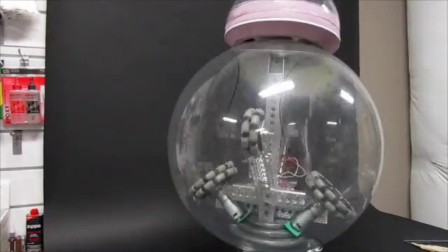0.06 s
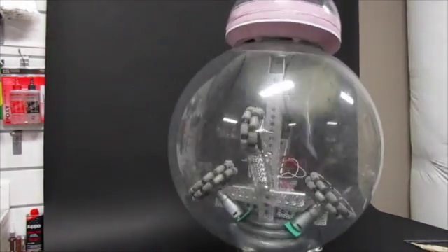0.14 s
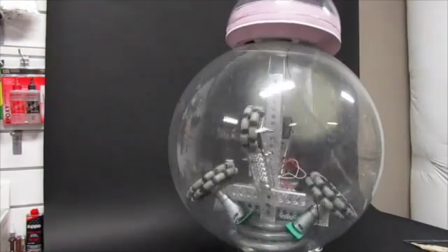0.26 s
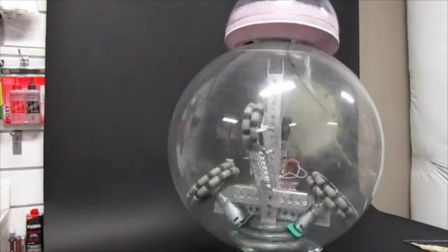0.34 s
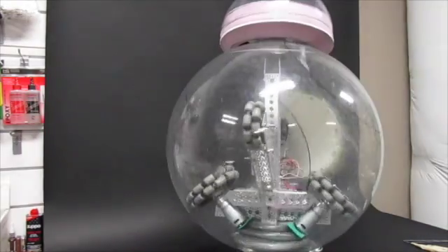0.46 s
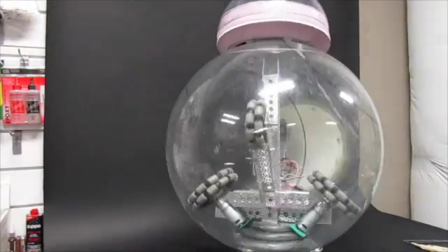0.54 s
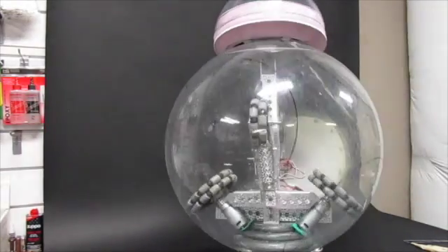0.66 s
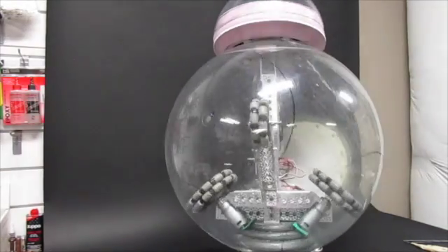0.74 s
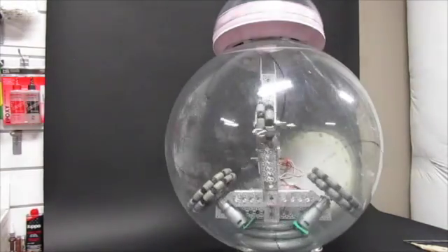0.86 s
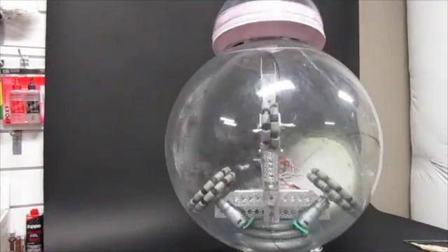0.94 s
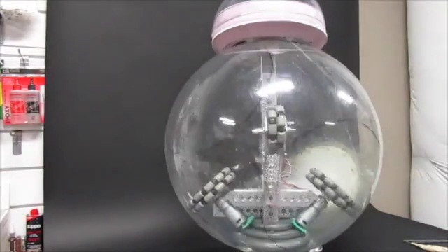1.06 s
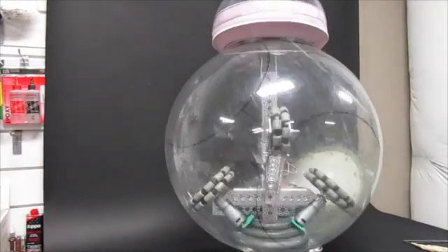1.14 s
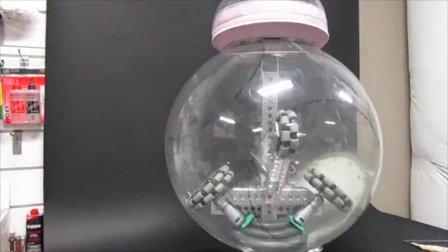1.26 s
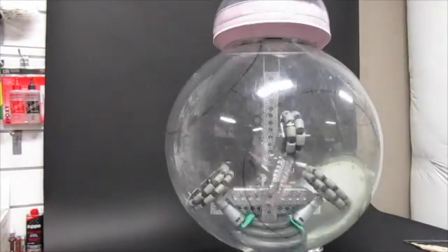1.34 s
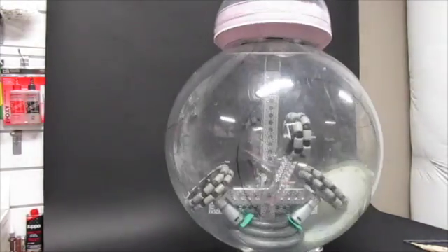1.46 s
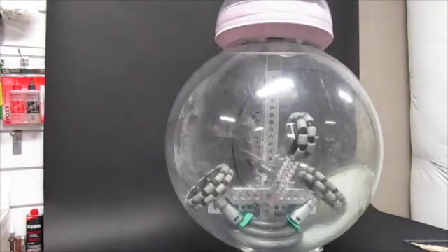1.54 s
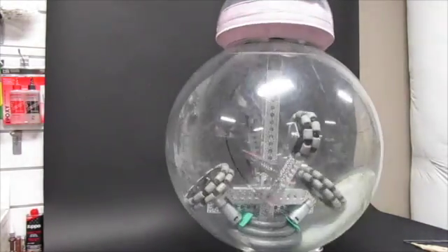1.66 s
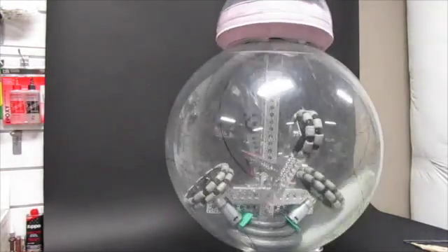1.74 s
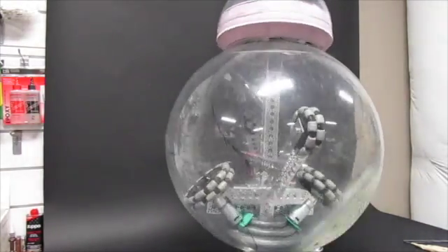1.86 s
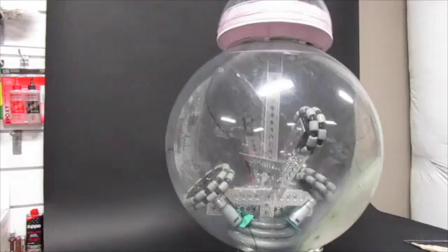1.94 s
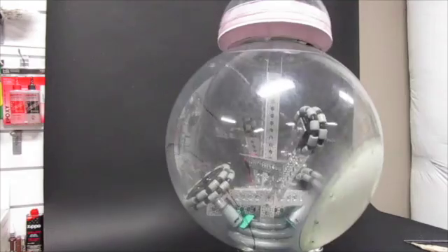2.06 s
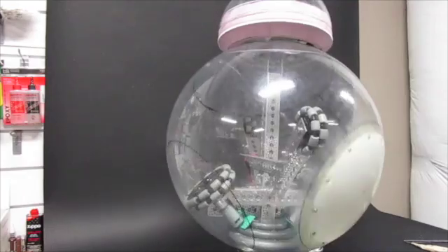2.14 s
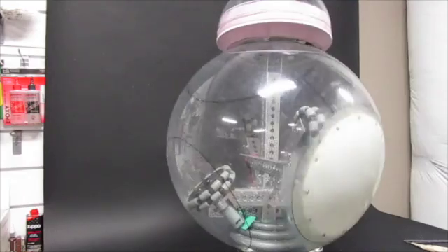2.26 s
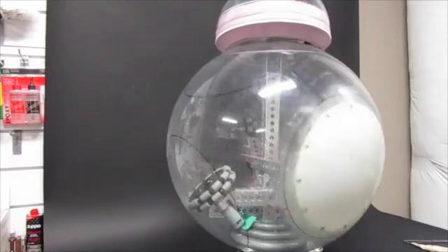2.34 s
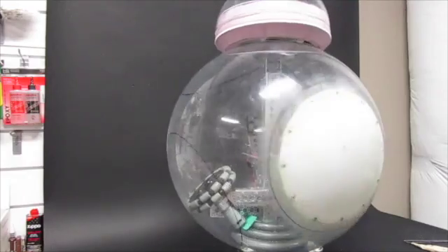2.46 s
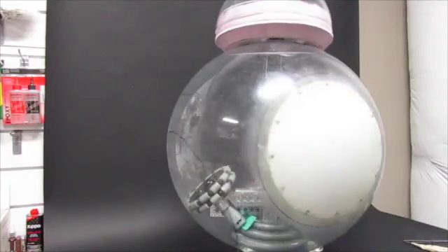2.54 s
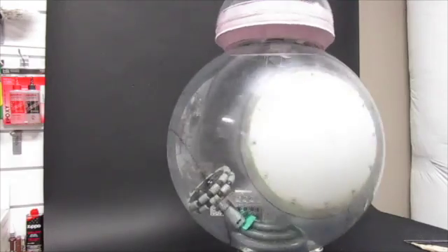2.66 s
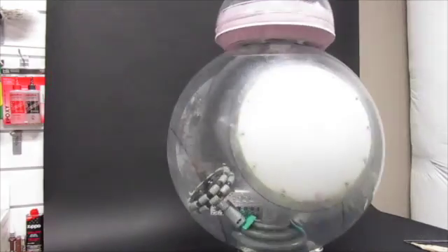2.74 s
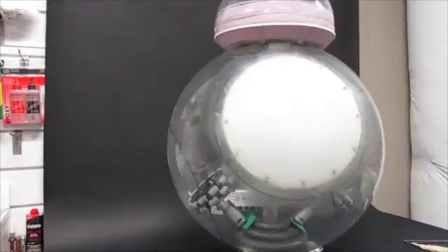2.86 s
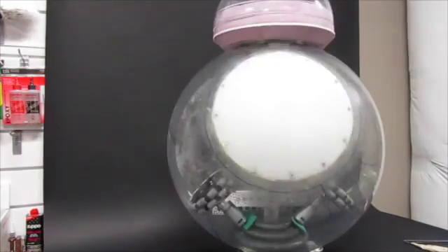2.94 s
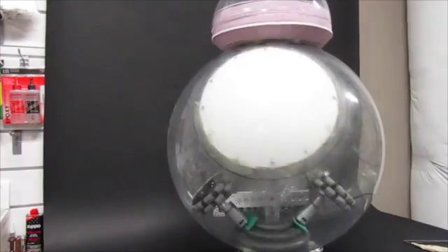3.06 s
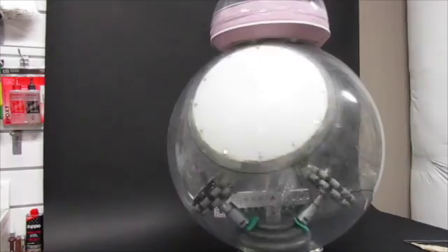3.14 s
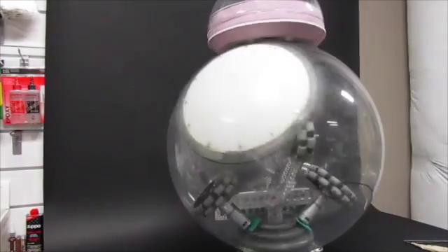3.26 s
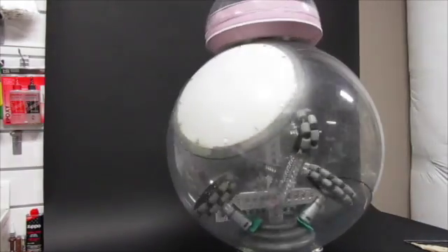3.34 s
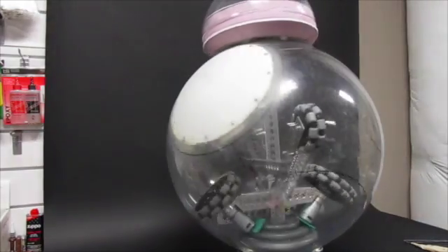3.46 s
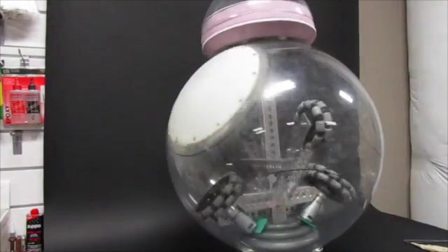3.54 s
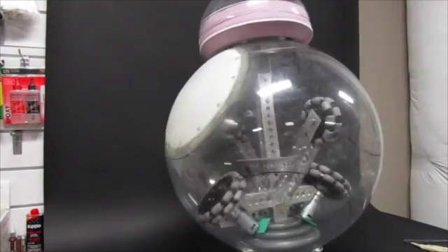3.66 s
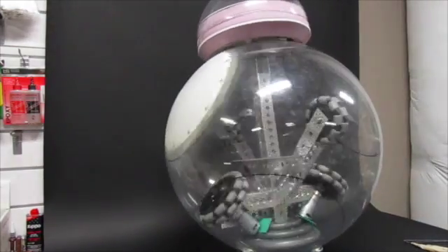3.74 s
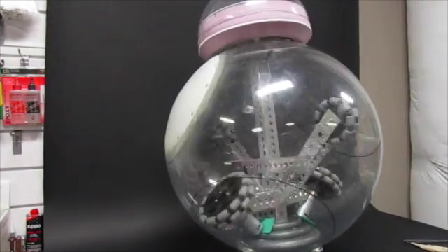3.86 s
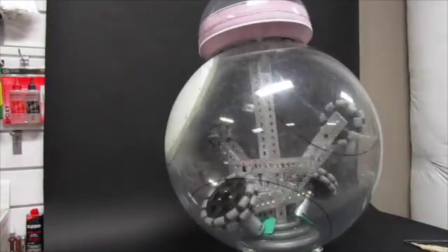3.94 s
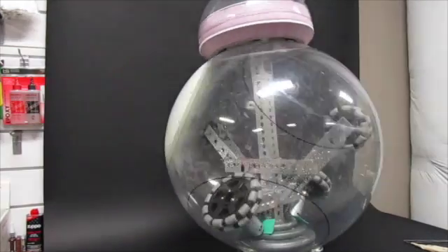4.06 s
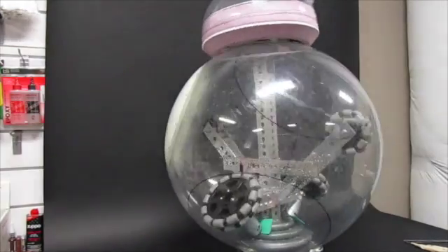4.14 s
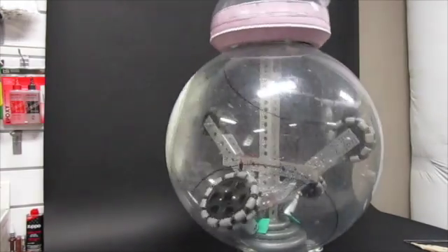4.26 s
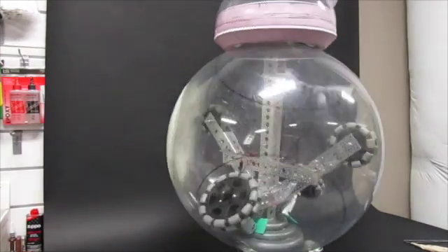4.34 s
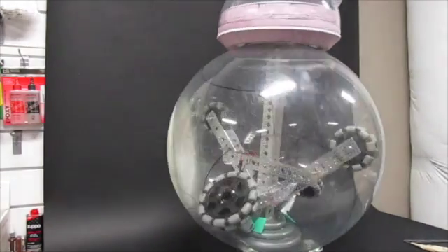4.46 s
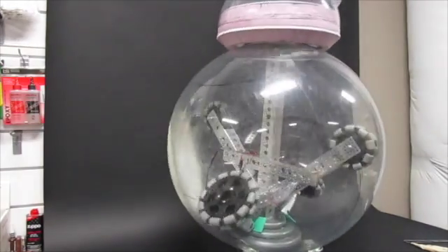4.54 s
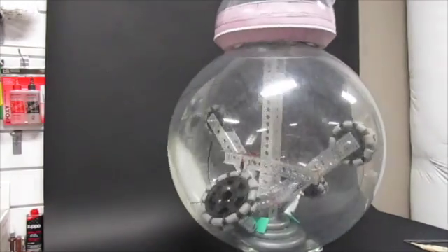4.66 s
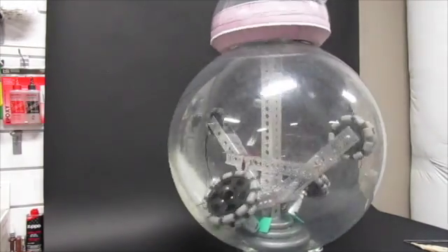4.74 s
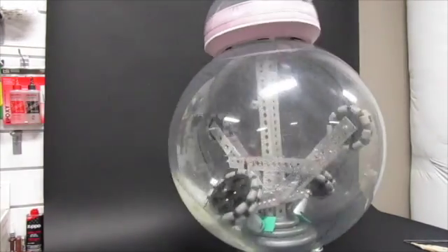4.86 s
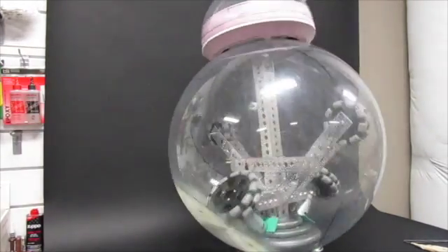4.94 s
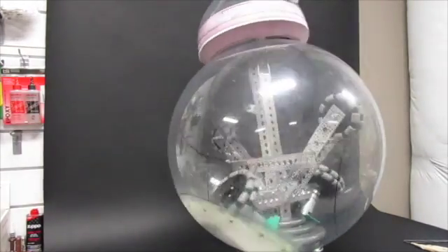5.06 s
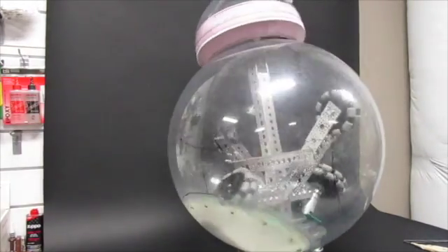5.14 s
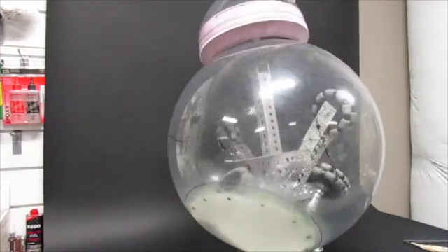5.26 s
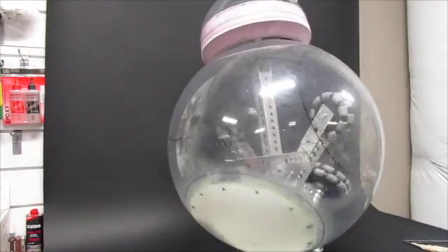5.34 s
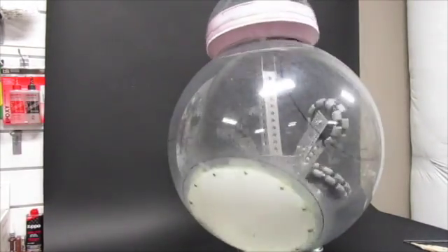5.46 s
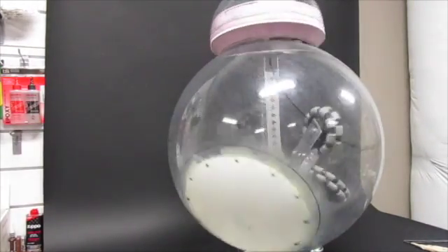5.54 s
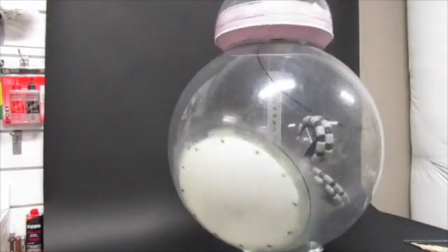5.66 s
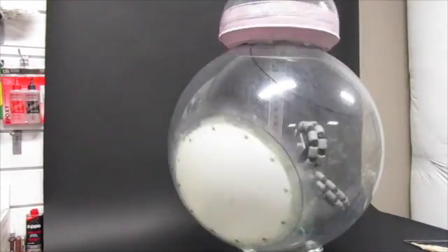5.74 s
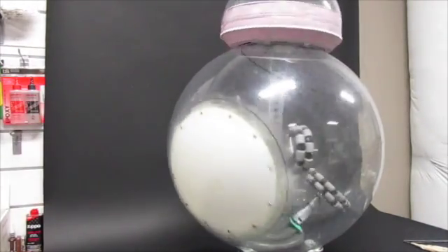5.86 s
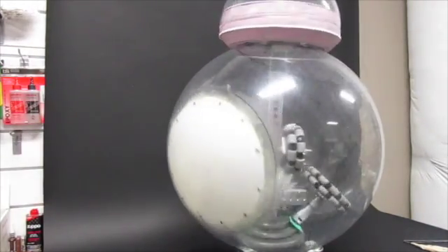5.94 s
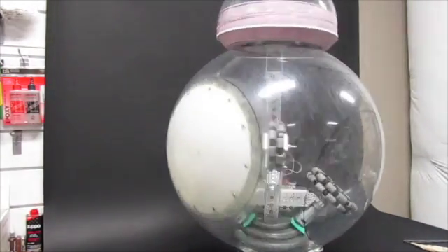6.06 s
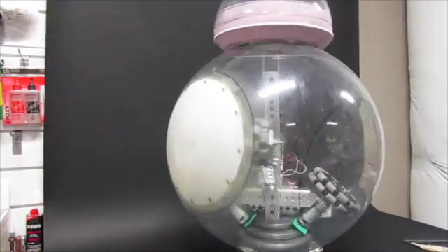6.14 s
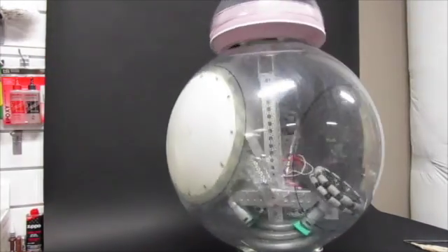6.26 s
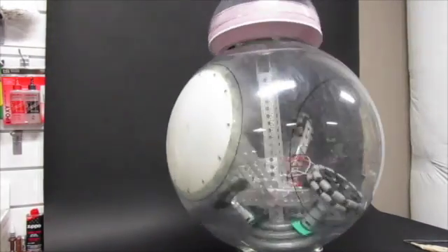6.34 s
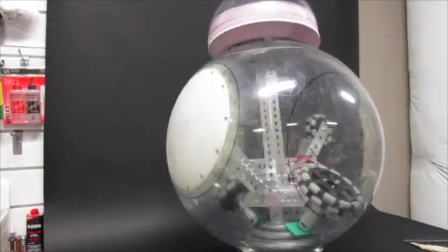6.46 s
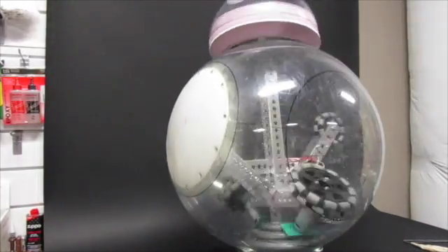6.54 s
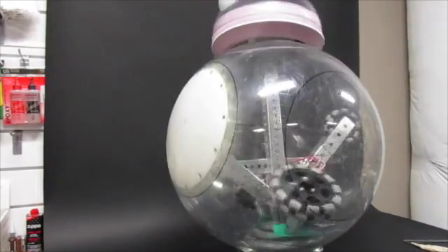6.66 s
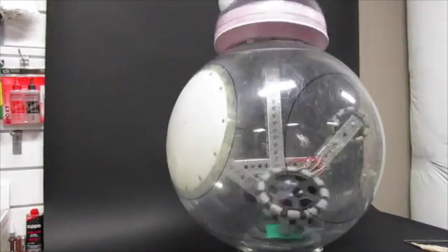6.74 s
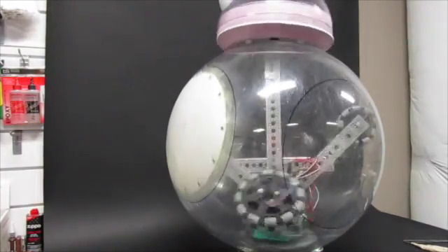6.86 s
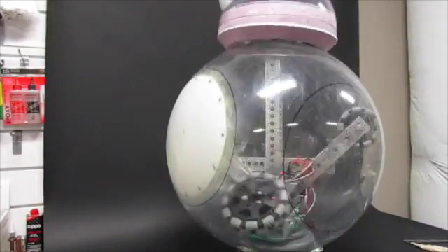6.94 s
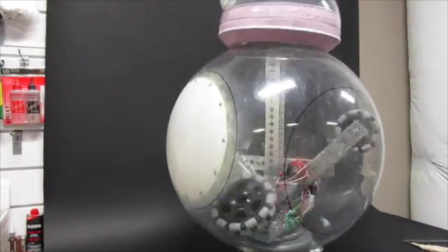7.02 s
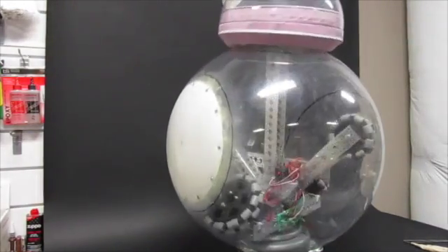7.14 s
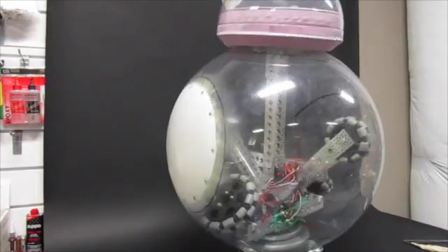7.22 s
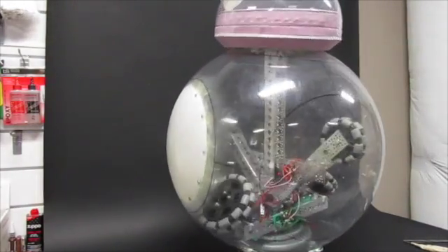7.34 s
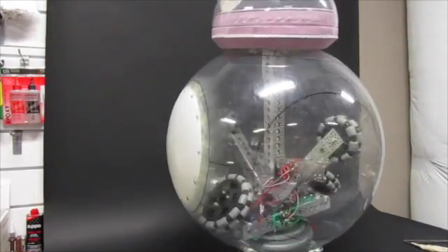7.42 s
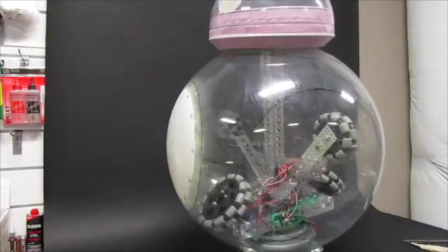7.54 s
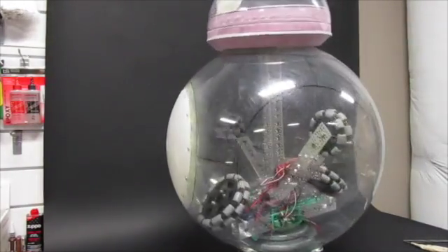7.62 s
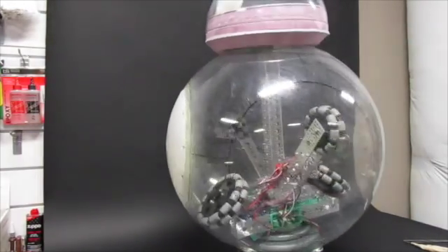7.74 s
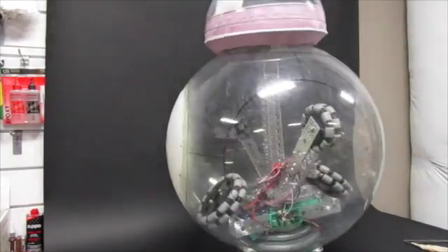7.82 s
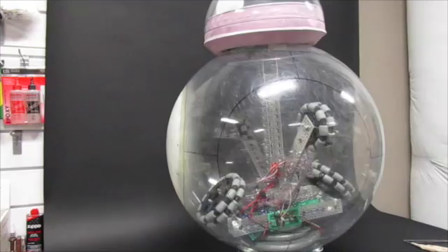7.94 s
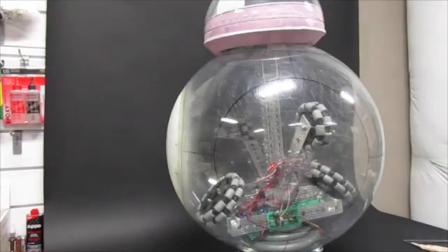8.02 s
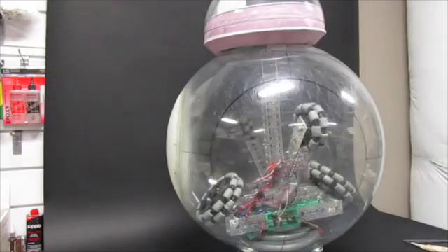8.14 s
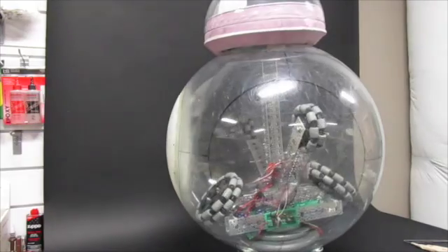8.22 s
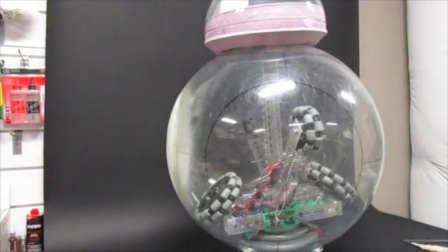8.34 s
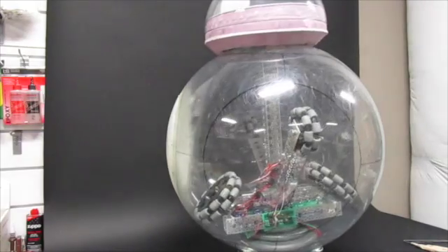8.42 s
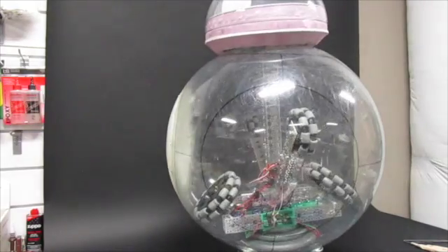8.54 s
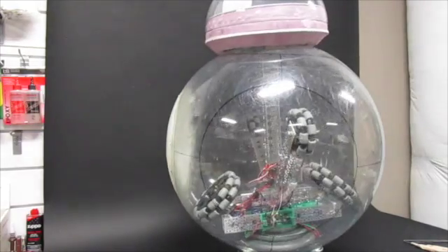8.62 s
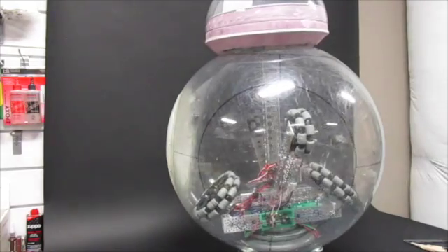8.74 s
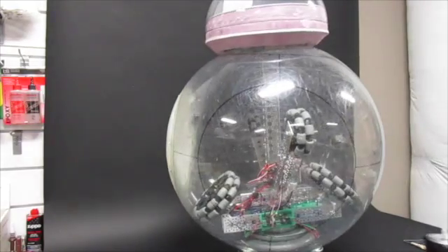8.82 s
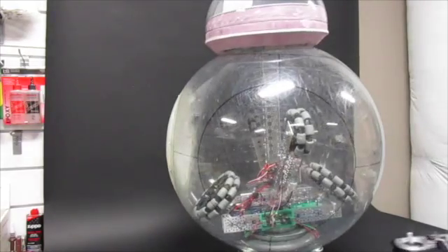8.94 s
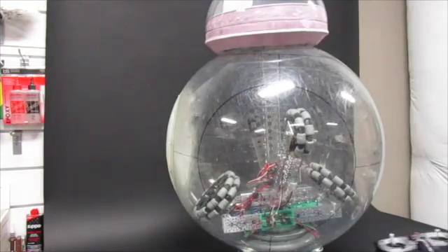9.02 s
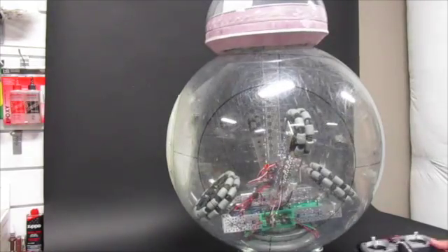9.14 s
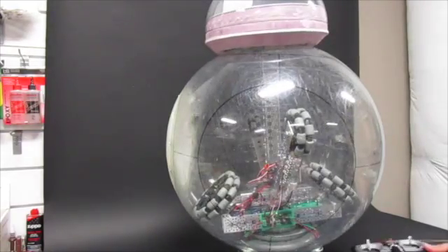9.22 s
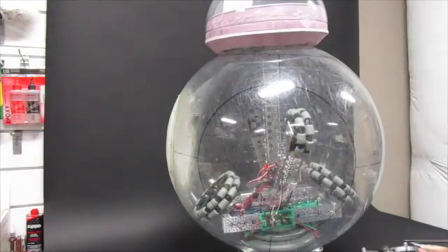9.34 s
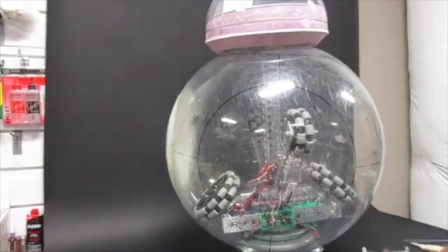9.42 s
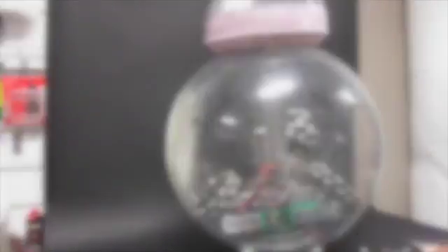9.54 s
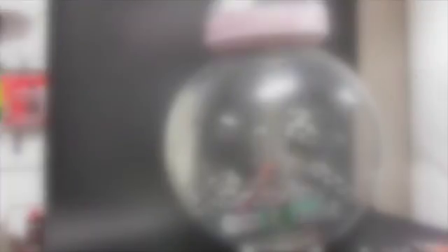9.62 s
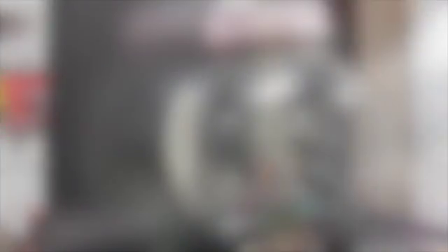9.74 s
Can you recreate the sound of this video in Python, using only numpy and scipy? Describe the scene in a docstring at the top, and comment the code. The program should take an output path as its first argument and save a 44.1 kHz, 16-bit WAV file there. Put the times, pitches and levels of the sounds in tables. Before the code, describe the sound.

A hollow ball's drive rasps with high metallic hiss, midrange rolling drone and occasional dull thumps. It rises and falls unevenly, falters after several seconds, gives one more short rush and dwindles into tiny bright clicks. Quiet room hum is left until hard plastic clacks and woody knocks land on the table; finally the room tone rises quickly. Same sound in both channels, close and fairly dry in a small workshop.

```python
"""A clear plastic sphere is turned from inside by small geared motors and roller wheels, in a quiet workshop.
Gears hiss and motors whirr as shaped noise; the shell drones, and thuds where a wheel crosses the hatch rim.
The drive slows and stops, ticking; then a hand controller slides and knocks on the table as damped tones and clicks.
Behind it an appliance hums over air rumble, faint hiss and a table shudder; at the end all this room sound
fades up quickly. Both channels are alike."""
import sys
import numpy as np
from scipy import signal
from scipy.fft import rfft, irfft, next_fast_len
from scipy.io import wavfile
from scipy.ndimage import uniform_filter1d, map_coordinates

SR = 44100
rng = np.random.default_rng(int(sys.argv[2]) if len(sys.argv) > 2 else 0)


def generate_wav(signal):
    """Clip the signal to [-1, 1] and save it as 16-bit WAV at the path in sys.argv[1]."""
    frames = np.transpose(np.atleast_2d(signal))
    scaled = np.clip(frames, -1, 1) * 32767
    pcm = np.round(scaled).astype(np.int16)
    wavfile.write(sys.argv[1], SR, pcm)


N = 431283

# wheels cross the hatch rim: [t/s, thud level/dB, thud f/Hz, knock level/dB, knock f/Hz, crack level/dB]
HATCH_THUDS = [(0.055, -37, 81.4, -40, 400, -46), (0.077, -43, 147, -35, 414, -34),
               (0.224, -39, 149, -43, 400, -55), (0.236, -47, 160, -52, 420, -46),
               (.247, -34, 166, -46, 383, -34), (1.389, -41, 190, -55, 500, -58),
               (2.157, -48, 124, -52, 600, -56), (2.39, -43, 121, -57, 510, -58),
               (3.179, -38, 129, -56, 585, -54), (4.888, -39, 90, -29, 330, -46),
               (4.907, -39, 90, -42, 300, -57), (4.928, -41, 95, -52, 300, -58),
               (5.421, -36, 88, -42, 250, -58), (5.909, -47.5, 119, -55, 500, -61),
               (6.299, -41, 60, -57, 400, -64), (6.766, -32.5, 130, -36, 815, -65),
               (6.794, -34, 120, -59, 600, -62), (6.8, -48, 130, -35, 596, -60),
               (6.824, -35, 110, -57, 695, -60)]


def drive():
    """Motors, gears and rollers work under one uneven load, which wavers more as the drive slows."""
    # the drive speeds up, eases and runs down in fits: [t/s, gear hiss level/dB, shell drone level/dB]
    drive_course = [(0.0, -42.5, -52), (0.25, -42.5, -52), (0.3, -45.5, -56), (0.64, -45.5, -57),
                    (0.77, -54.5, -63.5), (1.1, -51, -58.5), (1.25, -54.5, -63), (1.35, -48, -56.5),
                    (1.44, -55.5, -62), (1.64, -46, -56.5), (2.0, -43.5, -55), (2.23, -43.5, -52.5),
                    (2.53, -49, -58), (3.03, -49, -59.5), (3.17, -52.5, -60), (3.33, -49.5, -60),
                    (3.74, -55, -60.5), (4.06, -56.5, -61.5), (4.37, -42, -52), (4.83, -42, -53),
                    (5.03, -43, -56), (5.65, -50, -61), (5.92, -45.5, -56), (6.22, -44.5, -55.5),
                    (6.4, -52, -59), (6.51, -58, -65), (6.73, -84, -66), (6.9, -71.5, -62),
                    (6.96, -54, -62), (7.12, -54, -58.5), (7.28, -62.5, -66), (7.45, -70, -74),
                    (7.64, -68, -73), (7.67, -61, -69), (7.76, -59, -66.5), (7.92, -64, -66),
                    (8.1, -78, -77.5), (8.23, -84, -76), (8.45, -71, -74), (8.6, -76.5, -74),
                    (8.88, -91, -94)]
    hiss_db, drone_db = curves(drive_course, after_db=-120)
    stutter = 0.06  # growth of the load per dB that the hiss falls below -50 dB
    unevenness = 1 + stutter * np.clip(-50 - hiss_db, 0, 20)
    load = (wobble(9) + 0.73 * wobble(22)) * unevenness
    return (gear_hiss(hiss_db, load) + shell_drone(drone_db, load)
            + shell_rumble(drone_db, load) + motor_whirr(hiss_db, load))


def gear_hiss(hiss_db, load):
    """Gear teeth make grainy noise that also rings the metal frame."""
    # colour of the gear noise: [f/Hz, level per Hz/dB]
    gear_colour = [(2500, -47), (3200, -14), (4400, -10.5), (5300, -1.5), (6100, -3.5), (6500, -3.5),
                   (7000, -3), (10600, -2.5), (11300, -7.5), (12800, -8.5), (14000, -7), (14600, -7.5),
                   (16000, -31)]
    # metal frame resonances added to the gear noise: [f/Hz, width/Hz, level/dB]
    frame_modes = [(4940, 20, 0), (5470, 39, -5), (5635, 43, 4.5), (6110, 30, 0.5), (6160, 49, -4),
                   (6860, 30, -0.5), (7010, 31, 5.5), (7145, 30, 10), (7730, 72, 1), (8070, 41, 5),
                   (8700, 120, -12), (8460, 50, 2), (9330, 100, -2.5), (10440, 59, 0.5), (10900, 71, -0.5),
                   (12750, 200, -11.5), (14250, 73, -7), (15500, 80, 0)]
    teeth = lambda f: amp(along(gear_colour, f)) * (1 + peaks(frame_modes, f))
    hiss = filtered(rough(grain_db=1.5, grains=900, patchy_db=1.0), teeth)
    return amp(hiss_db + 0.51 * load) * hollow(hiss, depth_db=2.5, frames=12)


def shell_drone(drone_db, load):
    """Rollers rub the shell into its middle modes."""
    # shell modes, before a slight sharpening: [f/Hz, width/Hz, level/dB]
    shell_modes = [(1010, 79, -4), (1118, 87, 3), (1173, 80, -4), (1190, 57, -2.5), (1380, 110, -6),
                   (1475, 48, -10.5)]
    drone = filtered(rough(grain_db=2.0, grains=250, patchy_db=1.0), lambda f: peaks(shell_modes, f) ** 1.04)
    return amp(drone_db + 0.87 * load + flutter()) * hollow(drone, depth_db=2.5, frames=8)


def shell_rumble(drone_db, load):
    """Rolling also excites the low shell modes, with a level tied to the drone."""
    # low shell modes: [f/Hz, width/Hz, level/dB]
    low_modes = [(176.7, 26, 1.5), (235, 31, -1.5), (333, 36, -12.5), (400, 54, -0.5), (544, 54, -2.5),
                 (631, 80, -6.5), (910, 270, -13)]
    rumble_db = -57 + 0.88 * (drone_db + 58)
    rumble = filtered(rough(grain_db=1.0, grains=60, patchy_db=1.0), lambda f: peaks(low_modes, f))
    return amp(rumble_db + 0.52 * load + flutter()) * hollow(rumble, depth_db=2.0, frames=8)


def motor_whirr(hiss_db, load):
    """Motor housings resonate, with a level tied to the gear hiss."""
    # motor housing modes, before sharpening: [f/Hz, width/Hz, level/dB]
    housing_modes = [(1660, 340, -5.5), (2040, 100, 0.5), (2283, 135, 0), (2450, 89, -1), (2613, 97, 0)]
    whirr_db = -66 + 0.71 * (hiss_db + 50)
    whirr = filtered(rough(grain_db=1.5, grains=200, patchy_db=0.5), lambda f: peaks(housing_modes, f) ** 1.22)
    return amp(whirr_db + 0.61 * load + flutter()) * hollow(whirr, depth_db=2.0, frames=8)


def flutter():
    """A level waver in dB, drawn anew for each layer."""
    return 1.5 * wobble(12)


def hollow(x, depth_db, frames):
    """Echoes inside the sphere: a random, drifting comb of fine peaks and dips; the result has rms 1."""
    z = signal.stft(x, nperseg=2048)[2]
    comb = uniform_filter1d(rng.standard_normal(z.shape), 2, 0)  # across frequency
    comb = uniform_filter1d(comb, frames, 1)  # across time
    return unit(signal.istft(z * amp(depth_db * unit(comb)), nperseg=2048)[1][:N])


def drags():
    """A roller drags on the shell and briefly sings: narrow noise swells and fades around one pitch."""
    # drags: [t/s, length/s, f/Hz, level/dB]
    drag_events = [(0.61, 0.053, 1420, -69), (1.902, 0.11, 1435, -57), (2.15, .09, 1130, -54),
                   (2.474, 0.047, 1520, -60), (3.17, .1, 1130, -59), (3.76, .1, 1130, -60),
                   (4.263, 0.061, 1330, -53), (4.27, 0.038, 1500, -57), (4.389, 0.043, 1450, -50.5),
                   (4.8, 0.37, 2030, -62), (4.898, 0.038, 1440, -54), (7.08, .09, 1200, -62),
                   (7.264, 0.15, 1470, -68), (8.42, .2, 1130, -72)]
    out = np.zeros(N)
    for s, length, hz, db in drag_events:
        noise = filtered(rng.standard_normal(round(length * SR)), lambda f: peaks([(hz, 110, 0)], f) ** 1.1)
        add(out, s, amp(db) * unit(noise) * np.hanning(len(noise)) ** 0.39)
    return out


def thuds():
    """A rubber roller drops over the rim: a low cycle or two, a short hollow knock and a crack."""
    out, t = np.zeros(N), np.arange(SR // 4) / SR
    for s, db, low_hz, knock_db, knock_hz, crack_db in HATCH_THUDS:
        low = np.sin(2 * np.pi * low_hz * t) * amp(-60 * t / 0.048) * (1 - np.exp(-t / 0.00095))
        body = burst(0.084, lambda f: peaks([(low_hz, 150, 0)], f), 0.0041)
        knock = np.sin(2 * np.pi * knock_hz * t) * amp(-60 * t / 0.025) * (1 - np.exp(-t / 0.0013))
        crack = burst(0.017, lambda f: peaks([(1600, 920, 0)], f) * (f < 4500), 0.00028)
        thud = 1.17 * low + 0.46 * body
        add(out, s, amp(db) * thud + amp(knock_db) * knock + amp(crack_db) * crack)
    return out


def ticks():
    """Short bright puffs: rollers and gears click as the drive stalls; the last is part of the controller's knock."""
    # clicks: [t/s, level/dB, centre f/Hz]
    tick_events = [(6.8592, -54, 7450), (7.2817, -48, 8850), (7.4893, -51, 10400), (7.5361, -53, 7160),
                   (7.5736, -57, 5690), (7.6545, -48, 9390), (7.7028, -47, 7110), (7.7678, -46, 7170),
                   (8.0919, -54, 6500), (8.1817, -58, 6070), (8.2077, -61, 6520), (8.31, -60, 8170),
                   (8.3832, -60, 8170), (8.4341, -55, 9110), (8.5455, -58, 7050), (8.745, -62, 7060),
                   (8.9574, -59, 5950)]
    out = np.zeros(N)
    for s, db, hz in tick_events:
        bright = lambda f: (0.1 + peaks([(hz, 1800, 0)], f)) * (f > 4800)
        add(out, s, amp(db) * burst(0.052, bright, 0.00084))
    return out


def knocks():
    """The controller meets the table: table top and plastic case ring, with a snap of noise and a click."""
    # contacts: [t/s, blow level/dB, clack level/dB, click level/dB]
    contact_events = [(8.8969, -50, -42, -46), (8.907, -42.5, -48, -59), (8.92, -43.5, -58, -58),
                      (8.939, -48, -58, -62), (8.971, -46, -63, -63), (9.3947, -28, -38.5, -44.5),
                      (9.409, -49, -40, -60), (9.42, -35, -35.5, -62), (9.43, -36, -44, -62),
                      (9.452, -34, -47, -70), (9.484, -31.5, -38, -64), (9.499, -33, -46, -59),
                      (9.518, -34.5, -40.5, -64), (9.531, -39, -45, -68), (9.546, -47, -50, -70)]
    # table top modes: [f/Hz, level/dB, t60 when free/s]
    table_modes = [(133, -8.5, 0.14), (257, -7.5, 0.094), (328, -8.5, 0.073), (352.3, -0.5, 0.084),
                   (388, -2.5, 0.077), (472, -9.5, 0.077), (710, -14, 0.036)]
    # plastic case modes: [f/Hz, level/dB, t60 when free/s]
    case_modes = [(890, -4, 0.039), (1227, -3, 0.042), (1516, -3, 0.039), (1990, -11, 0.033),
                  (2670, -9, 0.041), (2950, -10, .03), (3670, -12, 0.027)]
    table_life, case_life = 0.79, 0.68  # shares of the free t60, with the hand still on the controller
    out = np.zeros(N)
    for s, blow_db, clack_db, click_db in contact_events:
        blow = ringing(table_modes, table_life, 0.002)
        snap = burst(0.057, lambda f: peaks([(1690, 1700, 0)], f) ** 2.3, 0.00055)
        clack = 0.61 * ringing(case_modes, case_life, 0.00036) + 0.66 * snap
        click = burst(0.027, lambda f: peaks([(6600, 4000, 0)], f) ** 1.6 * (f > 3500), 0.0002)
        add(out, s, amp(blow_db) * blow + amp(clack_db) * clack + amp(click_db) * click)
    return out


def ringing(modes, life, attack):
    """Damped modes struck at random strengths; life scales how long they ring."""
    t = np.arange(SR // 4) / SR
    ring = np.zeros(len(t))
    for hz, db, t60 in modes:
        strength_db = db + rng.normal(0, 2.6)
        ring += amp(strength_db - 60 * t / (t60 * life)) * np.sin(2 * np.pi * hz * t)
    return ring * (1 - np.exp(-t / attack)) ** 2


def slides():
    """The controller slides on the table cloth: a soft grainy rub that swells and fades."""
    # strokes: [t/s, length/s, level/dB]
    slide_events = [(8.648, .14, -75), (8.897, 0.076, -65), (9.117, 0.17, -73), (9.356, 0.072, -68),
                    (9.393, 0.098, -58), (9.466, 0.11, -62.5), (9.66, 0.13, -69.5)]
    # colour of the rub: [f/Hz, level per Hz/dB]
    cloth_colour = [(500, -30), (900, 1), (1800, 2.5), (2700, -1), (4000, -13), (7000, -10), (12000, -18),
                    (16000, -32)]
    out = np.zeros(N)
    rub = unit(filtered(rough(grain_db=1.5, grains=150, patchy_db=2), lambda f: amp(along(cloth_colour, f))))
    for s, length, db in slide_events:
        stroke = rub[round(s * SR):][:round(length * SR)]
        add(out, s, amp(db) * stroke * np.hanning(len(stroke)) ** 0.5)
    return out


def walls(x):
    """The workshop's short answer: a noise tail, each frequency dying at its own speed."""
    # decay of the workshop: [f/Hz, t60/s]
    wall_decay = [(100, 0.092), (1000, 0.36), (5000, 0.27), (14000, 0.17)]
    hz, t, z = signal.stft(rng.standard_normal(SR // 2), SR, nperseg=256)
    fade = amp(-60 * t / along(wall_decay, hz)[:, None])
    tail = signal.istft(z * fade, SR, nperseg=256)[1]
    late = np.pad(x, (300, 0))  # the answer starts 300 samples late
    return signal.fftconvolve(late, tail / np.linalg.norm(tail))[:N]


def shake():
    """Deep, slow shudders of the table, stronger after each thud."""
    noise = filtered(rng.standard_normal(N), lambda f: peaks([(33, 23, 0.54), (74.0, 40, 0)], f) * (f < 100))
    t = np.arange(N) / SR
    jolt_db, jolt_s = -27, 0.15  # jolt relative to its thud level; its fading time constant
    jolts = np.max([amp(db + jolt_db) * (t > s) * np.exp(-np.abs(t - s) / jolt_s)
                    for s, db, *_ in HATCH_THUDS], axis=0)
    steady = amp(-68 + fade_up() + 1.5 * wobble(3.2))
    return (steady + jolts) * unit(noise)


def room():
    """An appliance hums at twice the mains rate, a little unsteady, over air rumble and faint hiss."""
    # hum before the closing fade-up: [t/s, level/dB]
    hum_course = [(0, -65), (.5, -64), (1.3, -60), (2, -57), (4.4, -57), (5, -66), (5.5, -61), (6.1, -59.5),
                  (6.5, -57.5), (8, -55.5), (9.78, -57)]
    # colour of the air rumble: [f/Hz, level per Hz/dB]
    air_colour = [(50, -46), (85, -15), (105, -7.5), (140, -8), (200, -14), (260, -18), (450, -23),
                  (800, -49.5), (1200, -62)]
    # colour of the faint hiss: [f/Hz, level per Hz/dB]
    fine_colour = [(410, -38), (700, -13), (1870, -12), (2910, -16), (3820, -17.5), (4830, -23),
                   (11400, -24), (15500, -54)]
    hum_hz = 119.2
    air_follows, fine_follows = 0.94, 0.54  # dB per dB of the fade-up
    hum_db = curves(hum_course, after_db=-60)[0] + fade_up()
    turn = 2 * np.pi * hum_hz * np.arange(N) / SR + 0.26 * wobble(6)
    hum = np.sqrt(2) * (np.sin(turn) + 0.096 * np.sin(2 * turn)) * amp(1.5 * wobble(9))
    air = unit(filtered(rng.standard_normal(N), lambda f: amp(along(air_colour, f))))
    fine = unit(filtered(rough(grain_db=1.5, grains=220, patchy_db=1.0), lambda f: amp(along(fine_colour, f))))
    air_db = -61 + air_follows * fade_up() + 0.85 * wobble(4)
    fine_db = -77 + fine_follows * fade_up()
    return amp(hum_db) * hum + amp(air_db) * air + amp(fine_db) * fine


def fade_up():
    """Quick fade-up of all the room sound in dB, from a late moment to the end."""
    start_s, db_per_s = 9.44, 47
    return db_per_s * np.maximum(np.arange(N) / SR - start_s, 0)


def amp(db):
    """Gain of a level in dB."""
    return 10 ** (np.asarray(db) / 20)


def unit(x):
    """x at rms 1."""
    return x / np.sqrt(np.mean(x ** 2) + 1e-20)


def along(points, hz):
    """(Hz, value) points read on a log frequency axis."""
    f, v = np.transpose(points)
    return np.interp(np.log(hz + 1), np.log(f + 1), v)


def curves(rows, after_db):
    """One value per sample for each column after the time; after_db follows the last row."""
    s, *cols = np.transpose(rows)
    return [np.interp(np.arange(N) / SR, s, c, right=after_db) for c in cols]


def wobble(rate):
    """A smooth random curve, rate knots a second."""
    knots = rng.standard_normal(int(N * rate / SR) + 4)
    return map_coordinates(knots, [np.arange(N) * rate / SR])


def filtered(x, response):
    """x times a response of frequency."""
    m = next_fast_len(len(x) + 8192)
    return irfft(rfft(x, m) * response(np.fft.rfftfreq(m, 1 / SR)), m)[:len(x)]


def peaks(modes, f):
    """Size of the power-summed answer of damped resonances (Hz, width Hz, dB)."""
    return np.sqrt(sum(np.abs(amp(db) * f * w / (c * c - f * f + 1j * f * w)) ** 2 for c, w, db in modes))


def rough(grain_db, grains, patchy_db):
    """White noise of uneven tiny contacts, its level wavering at grains knots a second, in random patches."""
    contacts = rng.standard_normal(N) * amp(grain_db * wobble(grains))
    z = signal.stft(contacts, nperseg=256)[2]
    patches = uniform_filter1d(rng.standard_normal(z.shape), 5, 0)  # across frequency
    patches = uniform_filter1d(patches, 16, 1)  # across time
    return signal.istft(z * amp(patchy_db * unit(patches)), nperseg=256)[1][:N]


def add(track, s, sound):
    """Mix a sound into a track at a time in seconds."""
    part = track[round(s * SR):][:len(sound)]
    part += sound[:len(part)]


def burst(t60, response, attack):
    """A puff of coloured noise with a rise time constant attack, dying away over t60 seconds."""
    t = np.arange(SR // 4) / SR
    noise = unit(filtered(rng.standard_normal(len(t)), response))
    return 0.5 * noise * amp(-60 * t / t60) * (1 - np.exp(-t / attack))


def scene():
    """All sources, the same in both channels; only the hits excite the walls."""
    hits = thuds() + ticks() + knocks()
    mono = drive() + drags() + slides() + hits + amp(-6.5) * walls(hits) + shake() + room()
    return np.array([mono, mono])


def record(dry):
    """The microphone port cancels one band, and nothing passes above the band limit."""
    # the cancelled band: [f/Hz, width/Hz, depth/dB]
    port_notch = (4800, 417, -18.5)
    centre_hz, width_hz, depth_db = port_notch
    top_hz = 15660
    dip = lambda f: np.exp(-((f - centre_hz) / width_hz) ** 2 * 4)
    colour = lambda f: amp(depth_db * dip(f)) * (f < top_hz)
    return np.array([filtered(side, colour) for side in dry])


dry = scene()
out = record(dry)
generate_wav(out)
```